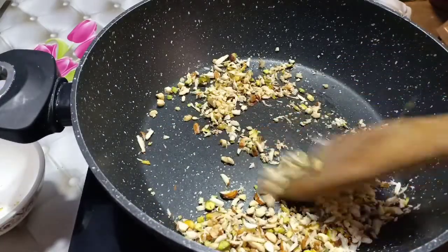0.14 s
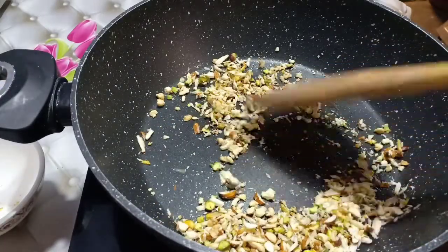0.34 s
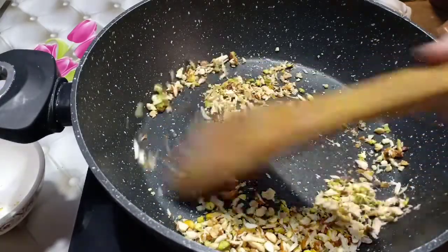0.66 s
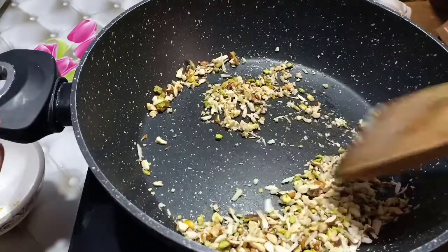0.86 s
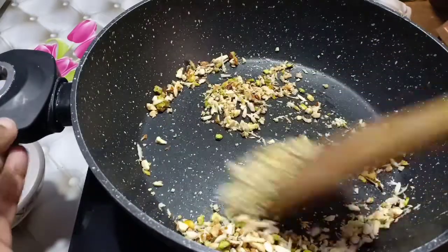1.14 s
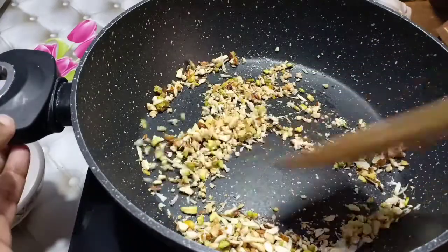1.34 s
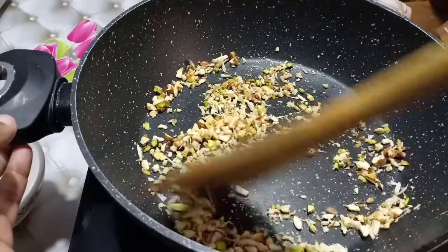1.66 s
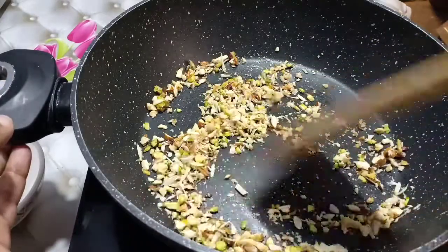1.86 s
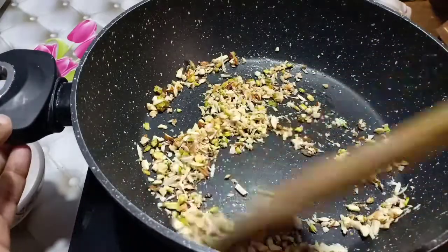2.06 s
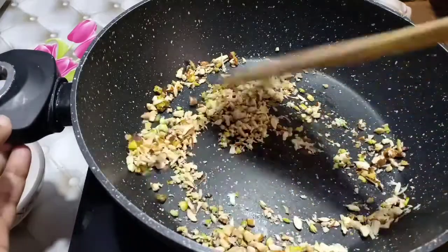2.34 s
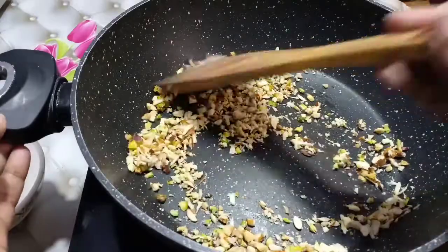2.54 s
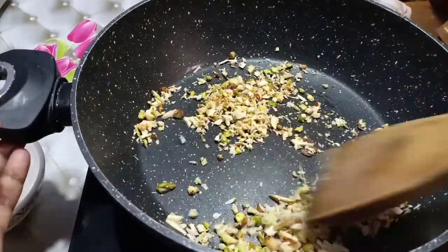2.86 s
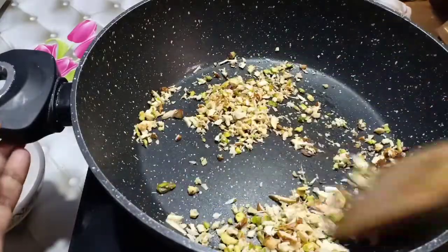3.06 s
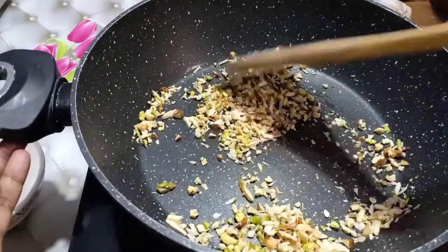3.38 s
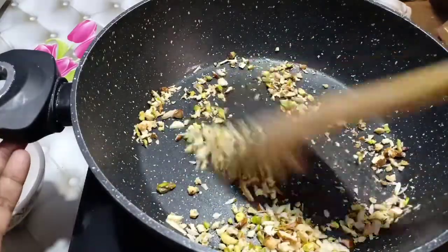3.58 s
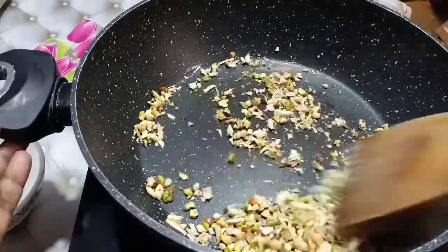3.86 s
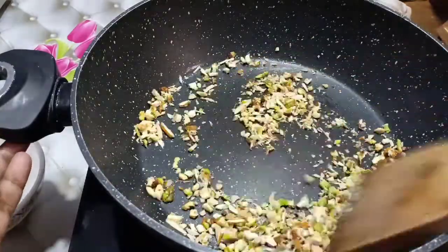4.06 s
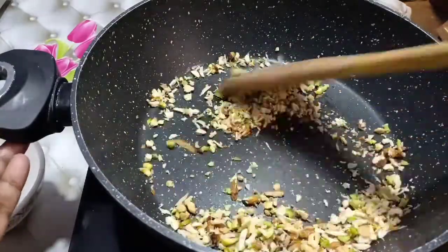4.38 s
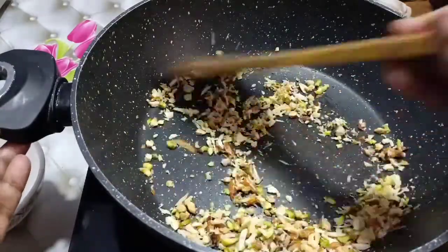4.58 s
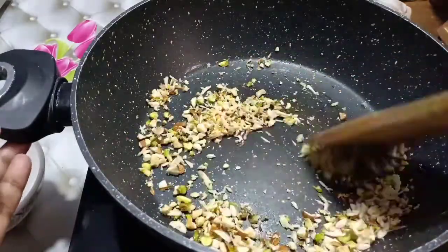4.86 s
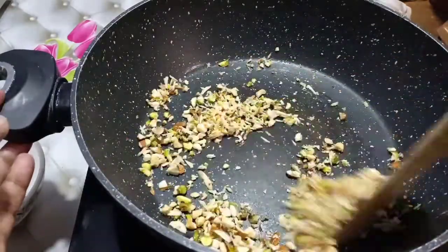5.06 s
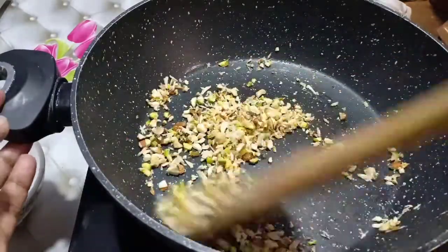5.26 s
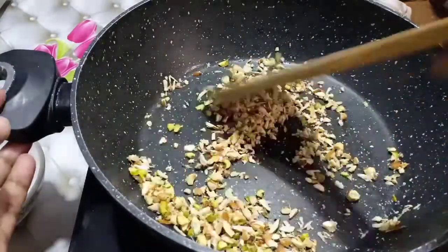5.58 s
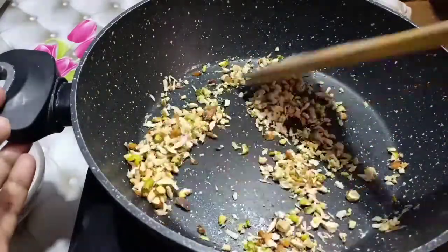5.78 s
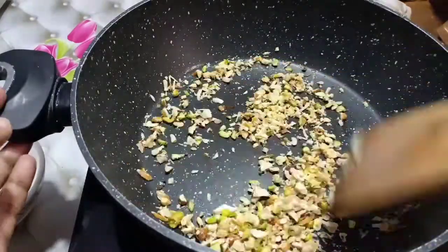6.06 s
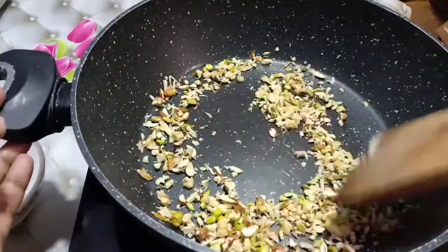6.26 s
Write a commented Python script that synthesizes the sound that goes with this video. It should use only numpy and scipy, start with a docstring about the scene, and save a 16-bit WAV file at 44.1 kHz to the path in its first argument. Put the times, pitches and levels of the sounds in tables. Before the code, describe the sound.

A wooden spatula stirs chopped nuts in a nonstick pan, heard close in a small kitchen over the low, slightly fluttering rush of a cooktop. From the start, grainy scraping strokes swell and settle about twice a second, and single pieces land with light ticks. The spatula knocks the pan several times, most clearly at about 1.4 and 2.9 seconds and again near 3.7, each a short ringing thud with a faint low rumble. Around 2.3 seconds all sound drops out for an instant. At about 4.25 seconds the background changes abruptly to a brighter, fan-like hiss with a thin whine and a faint high whistle that stops near 5.3 seconds. From that change the stirring is a high, crisp rustle in quicker strokes, strongest around 5 seconds, with many short dry clicks of wood and nuts until the end at about 6.5 seconds.

```python
"""Small kitchen, close by: a wooden spatula stirs chopped nuts in a nonstick pan.
Strokes slide the nuts (many tiny contacts) over the low rush of the cooktop; knocks ring and rock
the pan, single pieces drop on it. The sound drops out once. At 4.25 s the background turns abruptly
to a brighter hiss with a thin whine, and the stirring to a high rustle with short dry clicks."""
import sys
import numpy as np
from scipy import signal
from scipy.fft import rfft, irfft
from scipy.io import wavfile
from scipy.ndimage import uniform_filter1d

SR = 44100
rng = np.random.default_rng(int(sys.argv[2]) if len(sys.argv) > 2 else 0)


def store_wav(level_fs):
    """Save 16-bit WAV to argv[1]."""
    pcm = np.round(np.clip(np.atleast_2d(level_fs), -1, 1) * 32767)
    wavfile.write(sys.argv[1], SR, pcm.T.astype(np.int16))


N = 283563
TIME = np.arange(N) / SR

# spatula on pan: start_s, thud_db, ring_db, tick_db, thud_hz (levels relative)
PAN_KNOCKS = [(1.3737, -16, -16.5, -24.5, 730), (1.9125, -32, -46, -46, 440), (2.5625, -23, -44, -49, 490),
              (2.9217, -13.5, -20, -27, 440), (3.398, -42, -34, -38, 430), (3.74, -33, -28, -39, 570),
              (3.7465, -23, -30, -42, 430), (4.0885, -24, -57, -64, 440), (4.118, -32, -59, -53, 420)]
# left/right likeness of rush and hiss: freq_hz, correlation
RUSH_COHERENCE = [(60, 0.88), (150, 1), (380, 0.8), (700, 0.69), (1300, 0.0056), (2400, 0), (16000, 0.085)]
HISS_COHERENCE = [(60, 1), (200, 0.64), (400, 0.92), (800, .9), (1400, 0.76), (2400, 0.59), (4400, 0.12),
                  (8000, 0)]


def stirring(later):
    """Nuts slide, the spatula's edge makes the wall sing; where later is 1, only a high tumbling rustle."""
    # sliding and tumbling spectra: freq_hz, gain_db
    scrape_spectrum = [(600, -18), (1300, -6.5), (2400, -5.5), (3500, -8.5), (5500, -6.5), (6300, -10),
                       (7400, -17.5), (10000, -22), (12000, -26), (14000, -20.5), (16000, -29.5)]
    rustle_spectrum = [(1500, -14), (4000, -15), (6000, -5), (8000, -2.5), (9800, 2.5), (11500, -5),
                       (14000, -6.5), (16000, -5)]
    # resonances: centre_hz, width_hz, gain_db
    scrape_peaks = [(2410, 210, 1.6), (3350, 340, 2.4), (4980, 360, 6.4), (5840, 330, 6.7)]
    effort = stroke_effort()
    sliding = grains(per_s=1500, scatter_db=2.6, t60_s=.02)
    tumbling = grains(per_s=2500, scatter_db=2.6, t60_s=.008)
    rubbing = grains(per_s=490, scatter_db=-.5, t60_s=.018)
    scrape = unit(colour(sliding, scrape_spectrum, scrape_peaks)) * effort * undb(2)
    rustle = unit(colour(tumbling, rustle_spectrum)) * effort * undb(2)
    wall = band(rubbing, hz=2520, width_hz=290) * effort ** .8 * undb(-14.5)
    return lean(scrape + wall + pan_rocking(), -.8) * (1 - later) + lean(rustle, -1.2) * later


def stroke_effort():
    """Gain of the moving nuts: each stroke catches the heap, swells to its crest and settles."""
    # spatula pushes: crest_s, push_s, settle_s, relative_db
    strokes = [(.06, 0.12, 0.16, -52.5), (.51, 0.12, 0.11, -47), (.61, 0.082, 0.12, -48.5),
               (.98, 0.045, 0.17, -48.5), (1.3, 0.03, 0.22, -52.5), (1.5, 0.16, 0.17, -47.5),
               (1.985, 0.092, 0.18, -45), (2.52, 0.022, .12, -50.5), (2.66, 0.1, 0.14, -42),
               (3.07, 0.064, .11, -44.5), (3.32, 0.072, 0.086, -41.5), (3.49, 0.048, 0.13, -51.5),
               (3.79, 0.064, 0.095, -49), (3.94, .025, .08, -58), (4.255, 0.13, .05, -45),
               (4.34, .04, .07, -48), (4.445, .025, 0.049, -40.5), (4.665, 0.095, 0.055, -43),
               (4.83, 0.03, 0.057, -42), (4.96, .08, 0.062, -38.5), (5.04, .03, 0.12, -37),
               (5.3, .1, 0.042, -44), (5.52, .02, .03, -52), (5.595, 0.017, .04, -51),
               (5.712, 0.028, 0.03, -44.5), (5.847, .025, 0.023, -39), (5.94, .02, 0.085, -48.5),
               (6.05, 0.032, 0.037, -47), (6.14, .025, .04, -49), (6.256, .025, .025, -40.5),
               (6.346, 0.036, 0.04, -47)]
    catch_s, swell_db, settle_db = .006, 12.5, 15.5
    idle_db = -62  # a few nuts keep sliding between strokes
    power = undb(idle_db) ** 2
    for crest_s, push_s, settle_s, db in strokes:
        t = TIME - crest_s
        caught = np.clip((t + push_s) / catch_s, 0, 1)
        shape_db = np.minimum(swell_db * t / push_s, -settle_db * t / settle_s)
        power = power + (caught * undb(db + shape_db)) ** 2
    return np.sqrt(power)


def knocks_and_drops():
    """The pan wall rings at once, the heavy base swings up later; dropped pieces reach only high modes."""
    # pan modes: freq_hz, level_db, t60_s
    modes = [(133.3, -24, 0.24), (259, -17.5, 0.089), (338, -13.5, .03), (433.5, 2, 0.062),
             (473, -0.5, 0.026), (718, 6.5, 0.028), (833, -15.5, 0.02), (910, -0.5, 0.039),
             (1017, 2, 0.033), (1625, -20, 0.012), (1964, -6.5, 0.025), (2374, 10, 0.011),
             (2580, -14, 0.04), (2800, -20.5, 0.014), (3385, -4, 0.026), (4050, 3, 0.017), (4950, 4, 0.011),
             (5760, 0, 0.02), (6300, -5.5, 0.015), (9400, -6.5, 0.0067)]
    # pieces landing: start_s, relative_db
    drops = [(0.07, -33), (0.188, -32.5), (0.412, -36), (0.479, -31.5), (0.5082, -29), (0.8994, -33),
             (0.9672, -28), (1.118, -38), (1.274, -33.5), (1.3645, -22), (1.896, -32), (1.959, -32),
             (2.513, -27), (2.6298, -29), (3.03, -33)]
    out = np.zeros((2, N))
    for start_s, thud_db, ring_db, tick_db, thud_hz in PAN_KNOCKS:
        focus = 4.5 + .1 * (thud_db - ring_db)  # a soft push favours modes near thud_hz
        thud = ring(modes, 0, 1400, rise_s=.002, spread_rad=.7, centre_hz=thud_hz, db_per_oct=focus)
        wall = ring(modes, 1400, 3000, rise_s=.0007, spread_rad=.82)
        tick = ring(modes, 3000, SR, rise_s=.0004, spread_rad=1.47) + undb(-12) * crack(t60_s=.014)
        add(out, start_s, undb(thud_db - .9) * thud + undb(ring_db - 1.6) * wall)
        add(out, start_s, undb(tick_db - 1.5) * tick)
    for start_s, db in drops:
        ping = ring(modes, 1400, SR, rise_s=.0003, spread_rad=1.6) + undb(-17) * crack(t60_s=.012)
        add(out, start_s, undb(db - 14) * ping)
    return kitchen(lean(out, -.18), RUSH_COHERENCE, early_db=-10, early_s=.07, tail_db=-9.5, tail_s=.38)


def dry_clicks():
    """Wood and nuts clack; the harder the contact, the more upper modes and bright tick."""
    # contacts: start_s, clack_db, ring_db, tick_db, clack_hz, ring_hz (levels relative)
    contacts = [(4.2915, -50, -59, -39, 1090, 2070), (4.4208, -36, -27.5, -62, 1180, 1810),
                (4.4965, -37.5, -23, -28, 1150, 1710), (4.5943, -36, -26, -51, 1160, 1940),
                (4.7177, -42, -30.5, -34.5, 1170, 1750), (4.8, -34.5, -28, -38.5, 1070, 1800),
                (4.9958, -30.5, -23, -54, 960, 2050), (5.0298, -34.5, -26, -39, 1170, 2000),
                (5.1253, -37.5, -26, -29.5, 1140, 1770), (5.2563, -39.5, -35, -67, 930, 1820),
                (5.308, -56, -52, -43, 1100, 1800), (5.3862, -44.5, -29.5, -40.5, 940, 1700),
                (5.4385, -45, -36, -42, 1040, 1560), (5.4712, -41, -27.5, -60, 1180, 1680),
                (5.559, -42, -27.5, -22.5, 1180, 2030), (5.5804, -34, -25.5, -56, 1330, 1500),
                (5.6814, -32, -27.5, -51, 820, 1640), (5.808, -35.5, -53, -60, 530, 1700),
                (5.9352, -39, -32, -42, 1120, 1980), (6.1184, -42, -34, -47, 1170, 1860),
                (6.23, -37.5, -39, -51, 570, 1520), (6.4213, -37, -24.5, -42, 1200, 1660)]
    # click modes: freq_hz, level_db, t60_s
    modes = [(404.5, -15.5, 0.16), (504, -8, 0.04), (552, -4, 0.026), (697, -5.5, 0.028), (1004, 5.5, 0.01),
             (1310, 7.5, 0.0096), (1500, -1.5, 0.015), (1674, 8, 0.012), (1910, 3, 0.0099),
             (2150, -2.5, 0.0052), (3080, 0.5, 0.0081), (3490, 0.5, 0.0074), (3900, 2, 0.0066),
             (6340, -4, 0.0097), (8000, -28, 0.0017), (8400, 1, 0.0032), (9370, 12, 0.0021),
             (10300, -18, 0.0024), (12800, 2, 0.0013)]
    out = np.zeros((2, N))
    for start_s, clack_db, ring_db, tick_db, clack_hz, ring_hz in contacts:
        upper_db = ring_db + .41 * (tick_db - ring_db) - 3
        clack = ring(modes, 0, 1400, rise_s=.0011, spread_rad=.2, centre_hz=clack_hz, db_per_oct=6.5)
        body = ring(modes, 1400, 2600, rise_s=.00067, spread_rad=.29, centre_hz=ring_hz, db_per_oct=26)
        upper = ring(modes, 2600, 5000, rise_s=.00066, spread_rad=.68)
        tick = ring(modes, 5000, SR, rise_s=.0001, spread_rad=.97) + undb(-2) * crack(t60_s=.0031)
        add(out, start_s, undb(clack_db + 1.5) * clack + undb(ring_db + .5) * body)
        add(out, start_s, undb(upper_db) * upper + undb(tick_db - 2) * tick)
    low_cut = signal.butter(6, 350, "high", fs=SR, output="sos")  # the clicks carry no bass
    out = signal.sosfilt(low_cut, out)
    return kitchen(lean(out, -1.2), HISS_COHERENCE, early_db=-6, early_s=.032, tail_db=-11.5, tail_s=.15)


def pan_rocking():
    """Each knock rocks the pan on its support: a low rumble builds and dies away."""
    level_db, rise_s, t60_s = -45, .01, .78
    power = 0
    for start_s, *_ in PAN_KNOCKS:
        t = np.maximum(TIME - start_s, 0)
        power = power + ((1 - np.exp(-t / rise_s)) * undb(-60 * t / t60_s)) ** 2
    rumble = band(stereo_noise(N, RUSH_COHERENCE), hz=115, width_hz=85)
    return rumble * undb(level_db) * np.sqrt(power)


def cooktop_rush():
    """Low, slightly fluttering rush under the pan."""
    # broad shape: freq_hz, gain_db
    spectrum = [(30, -31.5), (60, -22.5), (110, -9.5), (200, -6.5), (380, -4.5), (600, -7.5), (950, -10),
                (1500, -17), (2400, -17.5), (3300, -26.5), (4300, -31.5), (6200, -38.5), (8000, -45),
                (16000, -53)]
    # resonances: centre_hz, width_hz, gain_db
    peaks = [(145, 40, 2.5), (244, 44, -3), (271.3, 11.5, 9), (388, 43, 6.5), (477, 77, 3.5),
             (623, 108, -8.5), (693, 120, 5), (950, 170, 4.5), (1350, 330, -2), (2420, 270, -0.5)]
    rush = unit(colour(stereo_noise(N, RUSH_COHERENCE), spectrum, peaks))
    return lean(rush, -1.85) * undb(-39 + .88 * walk(25.06))


def bright_hiss():
    """Fan-like hiss with narrow resonances, a wavering whine and a high whistle that stops early."""
    # broad shape: freq_hz, gain_db
    spectrum = [(40, -13.5), (110, -31.5), (200, -6.5), (420, -1.5), (800, 0), (1200, -4), (1600, 4),
                (2500, -6.5), (3600, -4), (5400, -12.5), (8000, -11), (10000, -16.5), (12000, -16.5),
                (16000, -25)]
    # resonances: centre_hz, width_hz, gain_db
    peaks = [(252, 120, -7.5), (410, 130, 0), (1100, 62, 6.5), (1310, 180, 2.5), (1477, 26, 10),
             (1560, 36, 3), (1970, 79, 5), (2470, 250, -3), (2846, 134, 9), (3790, 960, 3.5),
             (5030, 900, 0), (10200, 900, 5)]
    # whine: pitch_hz, level_db
    tones = [(1097, -53.5), (14616, -78)]
    whistle_end_s = 5.33
    hiss = unit(colour(stereo_noise(N, HISS_COHERENCE), spectrum, peaks))
    whine = sum(wavering_tone(hz, db) for hz, db in tones)
    whistle = band(rng.standard_normal((2, N)), hz=10000, width_hz=750) * undb(-55)
    whistle += wavering_tone(hz=9900, db=-63)
    hiss *= undb(-39 + .5 * walk(20))
    return lean(hiss + whine + whistle * (TIME < whistle_end_s), -1.7)


def kitchen(x, coherence, early_db, early_s, tail_db, tail_s):
    """Quick reflections from pan wall and counter, then the room's tail; times are t60."""
    t = TIME[:SR // 2]
    fade = sum(undb(db - 60 * t / t60_s) / np.sqrt(t60_s * SR / np.log(1e6))
               for db, t60_s in [(early_db, early_s), (tail_db, tail_s)])
    reflections = stereo_noise(len(t), coherence) * fade * (t > .002)
    return x + signal.fftconvolve(x, reflections, axes=1)[:, :N]


def ring(modes, lo_hz, hi_hz, rise_s, spread_rad, centre_hz=1000, db_per_oct=0):
    """One blow on the modes within a band; the spot hit favours those near centre_hz."""
    t = TIME[:SR // 6]
    out = np.zeros((2, len(t)))
    for k, (hz, db, t60_s) in enumerate(modes):
        detune, weight = rng.standard_normal(2)
        if lo_hz <= hz < hi_hz:
            db = db + 1.3 * weight - db_per_oct * abs(np.log2(hz / centre_hz))
            phase = (-1) ** k * spread_rad * np.array([[.5], [-.5]])  # left and right out of step
            out += undb(db - 60 * t / t60_s) * np.sin(2 * np.pi * hz * (1 + .026 * detune) * t + phase)
    return unit_energy(out * (1 - np.exp(-t / rise_s)))


def crack(t60_s):
    """Noise burst at the moment of contact."""
    t = TIME[:SR // 6]
    noise = band(rng.standard_normal((2, len(t))), hz=8150, width_hz=16000)
    return unit_energy(noise * undb(-60 * t / t60_s))


def grains(per_s, scatter_db, t60_s):
    """Many small contacts of uneven size, each a short noise burst."""
    hits = rng.random(N) < per_s / SR
    sizes = undb(scatter_db * np.minimum(rng.exponential(size=N), 4))
    energy = signal.lfilter([1], [1, -undb(-120 / (t60_s * SR))], (hits * sizes) ** 2)
    return rng.standard_normal((2, N)) * np.sqrt(energy)


def wavering_tone(hz, db):
    """Sine whose pitch wanders by about 3 Hz."""
    return undb(db) * unit(np.sin(2 * np.pi * np.cumsum(hz + 3 * walk(30)) / SR))


def stereo_noise(size, coherence):
    """White noise with a given left/right correlation per frequency."""
    mid, side = rfft(rng.standard_normal((2, size)))
    correlation = np.clip(along(coherence, np.fft.rfftfreq(size, 1 / SR)), -1, 1)
    mid *= np.sqrt((1 + correlation) / 2)
    side *= np.sqrt((1 - correlation) / 2)
    return irfft(np.array([mid + side, mid - side]), size)


def walk(rate_hz):
    """Smooth random wander, rms 1."""
    step = max(int(SR / rate_hz), 2)
    held = np.repeat(rng.standard_normal(N // step + 1), step)
    return unit(uniform_filter1d(held, step)[:N])


def colour(x, spectrum, peaks=()):
    """Filter by a broad spectrum plus bell-shaped resonances."""
    hz = np.fft.rfftfreq(N, 1 / SR)
    peaks_db = sum(db / (1 + (2 * (hz - centre_hz) / width_hz) ** 2) for centre_hz, width_hz, db in peaks)
    return irfft(rfft(x) * undb(along(spectrum, hz) + peaks_db), N)


def band(x, hz, width_hz):
    """Band-pass, rms 1."""
    edges_hz = hz * np.exp(np.array([-.5, .5]) * width_hz / hz)
    return unit(signal.sosfilt(signal.butter(2, edges_hz, "band", fs=SR, output="sos"), x))


def along(points, hz):
    """Interpolate (freq_hz, value) points over log frequency."""
    freq_hz, value = np.transpose(points)
    return np.interp(np.log(hz + 1), np.log(freq_hz), value)


def lean(x, left_db):
    """Stereo balance; negative leans right."""
    return x * undb(np.array([[left_db], [-left_db]]) / 2)


def add(out, start_s, sound):
    """Mix in a stereo sound."""
    i = int(start_s * SR)
    out[:, i:i + sound.shape[1]] += sound[:, :N - i]


def unit_energy(x):
    """Scale so that the mean square equals the number of samples in 10 ms."""
    return x / np.sqrt(np.sum(x ** 2) / len(x) / (.01 * SR))


def unit(x):
    """Scale to rms 1."""
    return x / np.sqrt(np.mean(x ** 2))


def undb(db):
    """Decibels to gain."""
    return 10 ** (np.asarray(db) / 20)


def scene():
    """Stirring, knocks and clicks over the rush, then the hiss."""
    change_s, crossfade_s = 4.25, .0044
    later = np.clip((TIME - change_s) / crossfade_s + .5, 0, 1)
    background = cooktop_rush() * (1 - later) + bright_hiss() * later
    return background + stirring(later) + knocks_and_drops() + dry_clicks()


def record(dry):
    """One brief dropout; the top treble is cut."""
    mute_s, resume_s, top_hz = 2.292, 2.430, 15750
    gate = uniform_filter1d(1. * ((TIME < mute_s) | (TIME > resume_s)), size=32)
    return signal.sosfilt(signal.ellip(10, .2, 80, top_hz, fs=SR, output="sos"), dry * gate)


dry = scene()
out = record(dry)
store_wav(out)
```